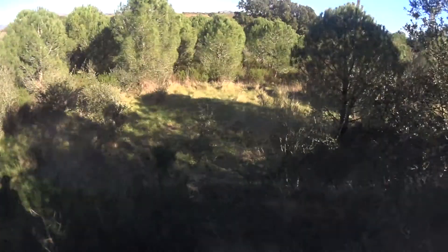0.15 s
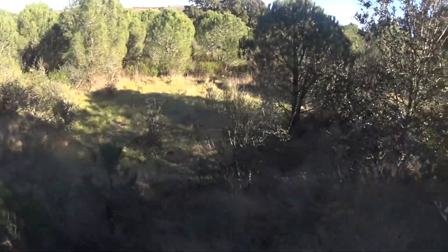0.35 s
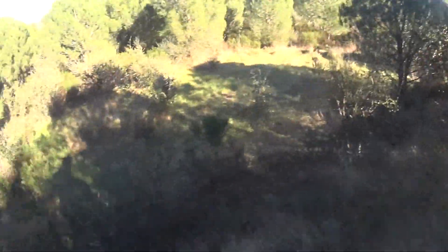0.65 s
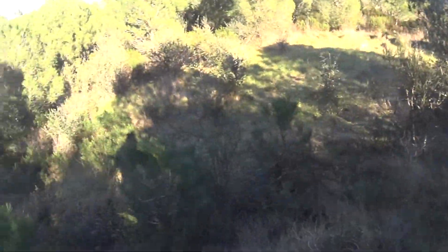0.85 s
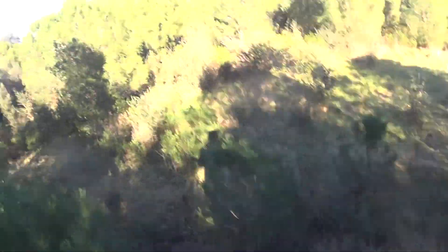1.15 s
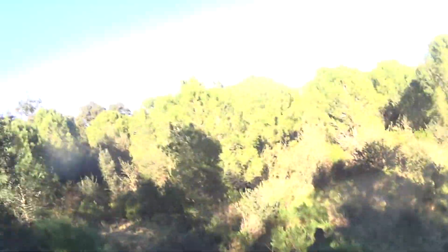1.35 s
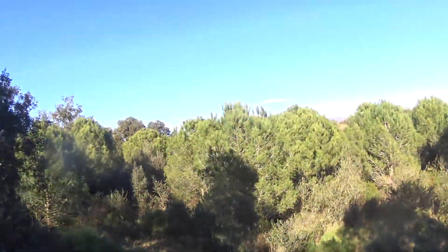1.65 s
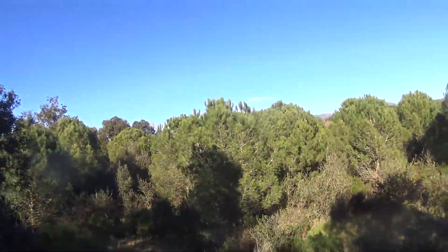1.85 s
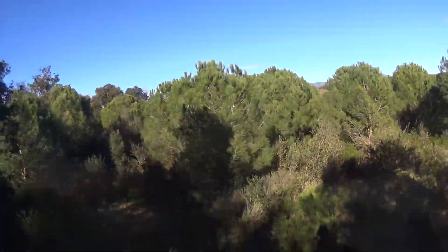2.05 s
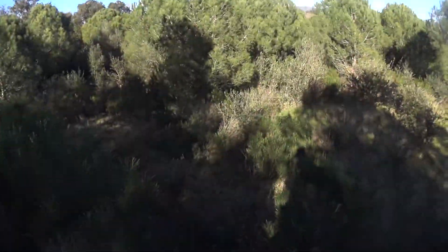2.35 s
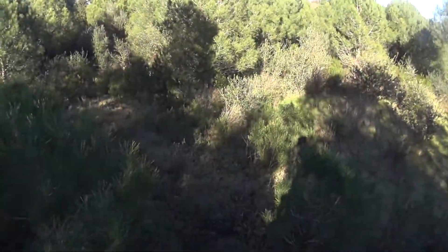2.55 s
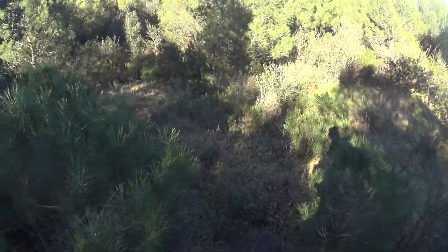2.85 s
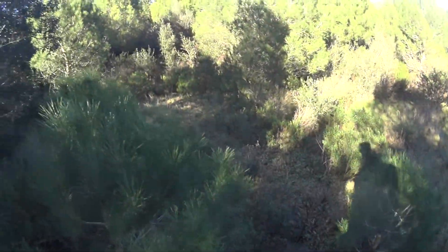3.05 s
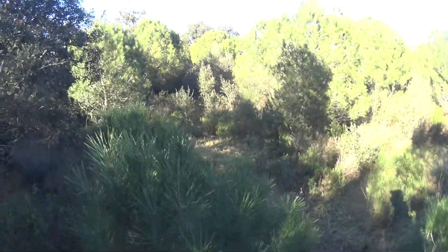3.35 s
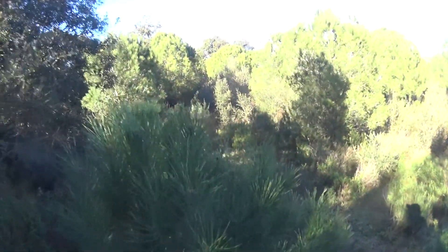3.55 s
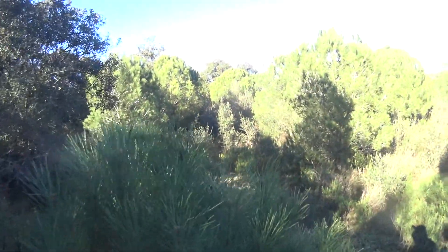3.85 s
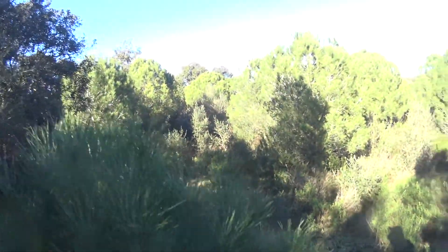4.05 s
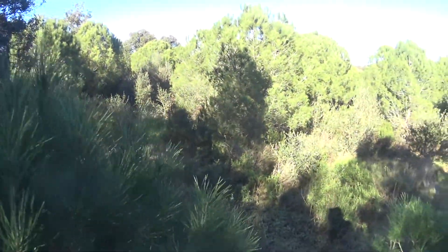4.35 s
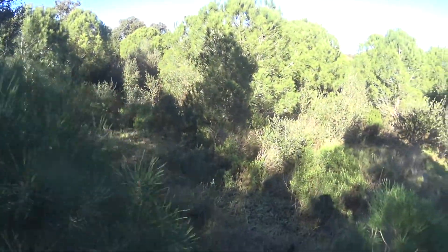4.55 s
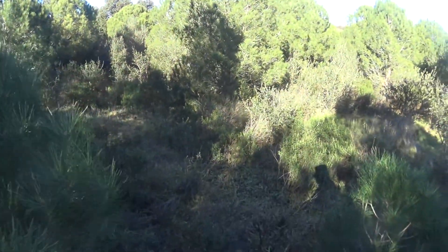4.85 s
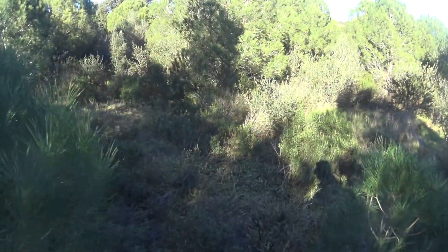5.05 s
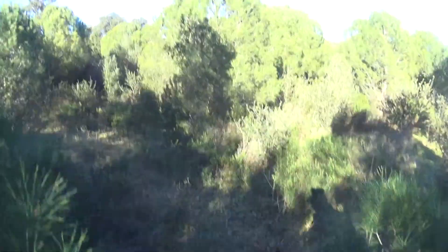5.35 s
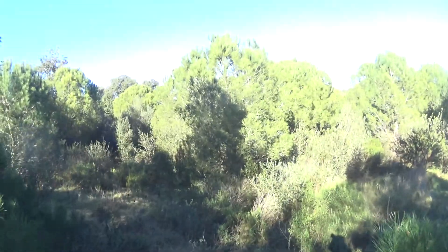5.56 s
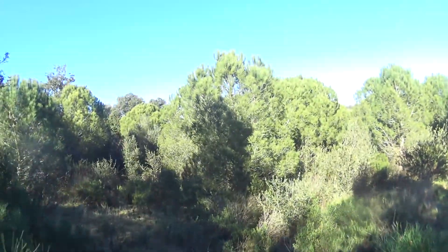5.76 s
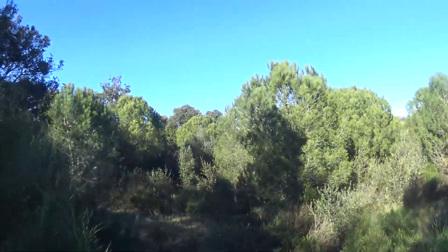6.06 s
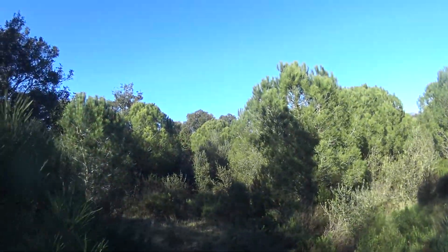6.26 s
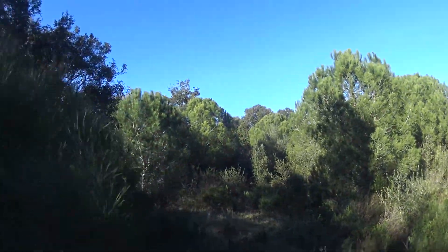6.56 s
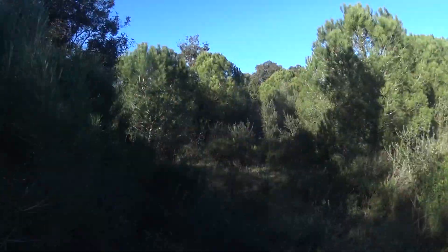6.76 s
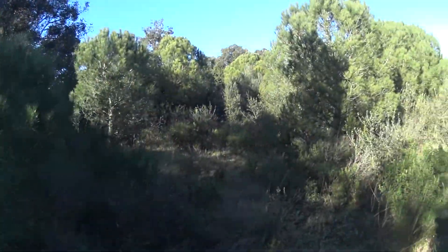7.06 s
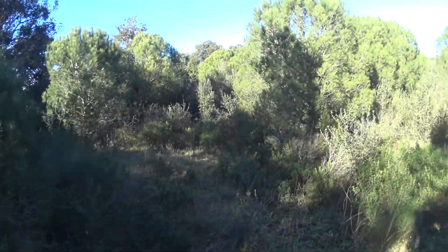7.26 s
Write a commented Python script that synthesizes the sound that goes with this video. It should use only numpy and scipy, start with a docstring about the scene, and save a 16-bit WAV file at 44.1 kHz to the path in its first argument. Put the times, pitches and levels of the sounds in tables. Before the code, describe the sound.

Outdoor walking through dense dry undergrowth, heard close in stereo from a small camera in hand, without echo. First come crackling stems, scattered snaps, dull steps and short plastic creaks; then needled boughs swish finely over cloth amid busier twig breaking. A hard housing knock comes late, followed by more steps and rustle over faint airy hiss.

```python
"""Dry stems crackle from the start as someone pushes through scrub, a small camera in hand.
Within half a second a twig snaps, a foot thuds softly and the camera's plastic housing creaks by stick-slip.
From about 3.3 s pine needles, a fine grain of noise, sweep over clothing; the hardest snap comes near 5 s.
Steps, stems and needles go on to the end; the hardest knock of the housing comes near 6.7 s.
Quiet open air, coloured noise, lies behind it all."""
import sys
import numpy as np
from scipy import signal
from scipy.fft import rfft, irfft, next_fast_len
from scipy.io import wavfile

SR = 44100
rng = np.random.default_rng(int(sys.argv[2]) if len(sys.argv) > 2 else 0)


def generate_wav(sig):
    """Save sig (samples, or channels by samples) to the path in sys.argv[1] as 16-bit PCM at SR."""
    pcm = np.round(np.clip(np.atleast_2d(sig).T, -1, 1) * 32767).astype(np.int16)
    wavfile.write(sys.argv[1], SR, pcm)


N = 326378
TIME_S = np.arange(N) / SR
LEFT_RIGHT = np.array([[1], [-1]])

# Spectra before level scaling. Each row: frequency in Hz, relative density in dB.
AIR_COLOUR = [(20, 7), (50, -5), (120, -7.5), (250, -9), (450, -9), (800, -12), (1200, -13), (2200, -8),
              (3500, -16), (6000, -21.5), (11000, -32)]
THUD_COLOUR = [(10, -10), (25, -0.5), (40, -12.5), (70, -18), (150, -38), (400, -63)]
BUMP_COLOUR = [(40, -48), (100, -5.5), (170, -0.5), (260, -11.5), (600, -53), (2000, -52)]
LITTER_COLOUR = [(120, -21), (280, -6.5), (480, -4.5), (900, -17), (2000, -10), (6000, -38)]
NEEDLE_COLOUR = [(300, -11), (1200, -11), (1500, -21), (1800, 1.5), (2400, -5), (3400, -7.5), (5300, -2.5),
                 (8000, -9.5), (11000, -10.5)]
TWIG_COLOUR = [(120, -34), (400, -10), (1300, -27), (2000, -3.5), (2600, 0.5), (3700, -1.5), (5000, 3),
               (6500, -0.5), (7400, -0.5), (8500, -4), (9800, 3), (11000, -3)]
STEM_COLOUR = [(300, -18.5), (1100, -16.5), (1450, -7), (1900, 3.5), (2500, 5), (3700, -3), (4400, -2.5),
               (5250, -2), (6500, -6), (7400, -7), (8400, -11), (9600, -5.5), (11000, -6)]
# Stereo width at the two microphone ports. Each row: frequency in Hz, gain of the side signal in dB.
AIR_WIDTH = [(30, -30), (110, -9), (300, -0.5), (1000, 6.5), (2200, -1.5), (6000, 3.5)]
HOUSING_WIDTH = [(800, -10.5), (1900, -14), (2800, -4), (5000, -7), (6800, 12), (10000, -4)]
BRUSH_WIDTH = [(60, -5), (300, -1.5), (1100, -4), (2100, -11.5), (3600, -11), (6500, -3.5), (11000, 0)]
# Footfalls. Each row: start in seconds, length in seconds (peak at a third of it), then peak levels in dB of
# the thud, the bump of the ground and the dull crunch of the litter.
STEPS = [(0.325, 0.18, -52, -73, -65), (1.145, 0.1, -56, -74, -61), (1.64, 0.12, -68, -60.5, -62),
         (1.966, 0.25, -54.5, -56.5, -66), (3.47, 0.26, -45, -64, -64), (4.347, 0.055, -61, -60.5, -52.5),
         (5.179, 0.11, -52, -59.5, -63), (5.753, 0.16, -62, -79, -58), (6.539, 0.096, -67, -70, -49.5),
         (6.614, 0.26, -51, -58, -54.5), (7.33, 0.061, -49, -62.5, -67)]
# Runs of slips in the housing. Each row: time of the first full slip in seconds, level in dB,
# length in seconds, frequency in Hz of the ring that paces the slips, hardness in dB.
CREAKS = [(0.475, -32.5, 0.0079, 1833, -1), (0.4902, -43, 0.0014, 1960, -7),
          (1.58, -35, 0.0098, 1780, -5.5), (2.119, -34, 0.0046, 1690, 4.5), (3.243, -34, 0.016, 1885, -2),
          (3.4518, -38, 0.007, 1863, -2), (5.193, -53.5, 0.033, 1693, 1), (6.286, -31.5, 0.01, 1942, 3),
          (6.4880, -45, 0.017, 1756, -8), (6.619, -53, 0.0067, 1736, -9), (6.744, -27.5, 0.0033, 1880, 8)]
# Modes of the housing. Each row: frequency in Hz, width in Hz, level before contact colour in dB.
HOUSING_MODES = [(540, 250, -19.5), (825, 160, -12.5), (1297, 64, -15), (1720, 37, -17.5), (1748, 573, 3),
                 (2267, 515, -1), (3366, 180, -13.5), (4154, 220, -8.5), (5230, 150, -8.5),
                 (7600, 230, -24.5)]
# Pine boughs sliding over clothing. Each row: time of full rise in seconds, length in seconds, level in dB.
BOUGH_PASSES = [(3.38, 0.42, -48), (3.82, 0.38, -52.5), (4.35, 0.77, -49), (5.15, 0.19, -55),
                (5.4, 0.47, -62.5), (6.16, 0.031, -52.5), (6.53, 0.16, -57), (6.81, 0.086, -60),
                (6.94, .12, -52.5), (7.11, 0.39, -57)]
# Twigs that stand out, loud or alone.
# Each row: time in seconds, level before the brightness tilt in dB, brightness setting in dB.
SNAPS = [(0.1322, -46, -12), (0.3084, -39, -8), (0.3128, -38.5, 21.5), (1.0698, -44, 11), (1.6868, -58, 6),
         (1.9277, -43.5, -2), (3.1543, -53, 8), (3.4164, -40, 6), (3.4725, -52, 22.5), (3.6289, -34, 2.5),
         (3.704, -36, -1.5), (4.2003, -45.5, 7), (4.2586, -44, -8), (4.552, -45.5, -21), (4.5842, -47, -10),
         (4.6515, -42, 3), (4.765, -46, 8.5), (4.7803, -45.5, -27), (4.823, -47, -18), (4.8367, -39, -3.5),
         (4.9412, -43.5, 9), (4.975, -44.5, 12), (5.0289, -30, -1.5), (5.0618, -42, -10),
         (5.0947, -42.5, 4), (5.134, -45.5, -24)]
# Legs pushing through dry stems; dead leaves crackle brightly, soft grass swishes dully.
# Each row: time of full rise in seconds, length in seconds, level in dB, treble relative to it in dB.
STEM_PUSHES = [(0.0, 0.23, -47.5, -5), (0.307, 0.058, -40.5, 2), (0.452, 0.12, -43.5, -7),
               (0.652, 0.13, -45.5, -4), (0.85, 0.048, -52.5, 0.5), (1.044, .13, -52, 2),
               (1.283, 0.28, -52, -13), (1.907, 0.35, -48.5, -3.5), (2.105, 0.17, -48.5, -16),
               (2.53, 0.22, -54.5, 3.5), (2.821, 0.15, -51, 3), (3.062, 0.19, -49.5, -4.5),
               (3.371, 0.24, -43.5, 1), (3.906, 0.58, -46, -2.5), (4.56, 0.53, -44, -0.5),
               (5.167, 0.12, -50, -0.5), (5.782, 0.05, -53.5, -3.5), (5.967, 0.036, -52.5, -6),
               (6.526, 0.23, -48.5, -2), (6.94, 0.54, -52.5, -8)]

AIR_DB = -56.5
LITTER_DRAG_DB = -16.5  # litter dragged by the feet, relative to the stems
BOUGH_ATTACK_S, BOUGH_EASE_DB_PER_S, BOUGH_T60_S = 0.05, 1, 0.33
PEAK_SMALL_SNAPS_PER_S = 13  # at the hardest push of the boughs
SMALL_SNAP_DB, SMALL_SNAP_SPREAD_DB, BRIGHTNESS_SPREAD_DB = -51, 2.5, 8
TYPICAL_SNAP_T60_S, TYPICAL_SNAP_DB = 0.0094, -44
STEM_ATTACK_S, STEM_EASE_DB_PER_S, STEM_T60_S = 0.09, 6, 0.41
STEM_REST_DB, TREBLE_HZ = -60, 5330  # stems stirring between pushes; where their treble begins
TOP_HZ = 11000


def undb(db):
    """Decibels to gain."""
    return 10 ** (np.asarray(db) / 20)


def unit(x):
    """Scale to rms 1."""
    return x / np.sqrt(np.mean(x ** 2) + 1e-20)


def colour(x, points):
    """Causal minimum-phase filter with the given (Hz, dB) response."""
    size = x.shape[-1]
    point_hz, point_db = np.transpose(points)
    hz = np.fft.rfftfreq(2 * size, 1 / SR) + 1  # keeps the log finite
    log_gain = np.log(undb(np.interp(np.log(hz), np.log(point_hz), point_db)))
    cepstrum = irfft(log_gain)[:size]
    cepstrum[1:] *= 2
    response = np.exp(rfft(cepstrum, 2 * size))
    return irfft(rfft(x, 2 * size) * response)[..., :size]


def ports(pair, width):
    """Left and right from a mid and a side signal."""
    return pair[0] + LEFT_RIGHT * colour(pair[1], width)


def noise():
    """Two unrelated white noises, at least as long as the scene."""
    return rng.standard_normal((2, next_fast_len(N, real=True)))


def walk(knots_per_s):
    """Random wander, linear between knots, with a spread near 1."""
    knots = rng.standard_normal(N // 100)
    return 1.2 * np.interp(TIME_S * knots_per_s, np.arange(len(knots)), knots)


def fade(t_s, t60_s):
    """Exponential decay, 60 dB down after t60_s."""
    return np.exp(-np.log(1000) * t_s / t60_s)


def add(out, start_s, sound):
    """Mix a sound in at start_s."""
    start = max(int(start_s * SR), 0)
    part = sound[:, :N - start]
    out[:, start:start + part.shape[1]] += part


def pushes(rows, attack_s, ease_db_per_s, t60_s):
    """Gain of pushes: each rises, eases off and dies away; overlapping ones add in power."""
    power = 0
    for full_s, length_s, db in rows:
        age_s = TIME_S - full_s
        rise = np.clip(1 + age_s / attack_s, 0, 1)
        eased = undb(db - ease_db_per_s * np.clip(age_s, 0, length_s))
        release = fade(np.maximum(age_s - length_s, 0), t60_s)
        power = power + (rise * eased * release) ** 2
    return np.sqrt(power)


def fracture(t60_s, scatter_db, scatter_t60_s, size=4096):
    """A fibre breaks: a short irregular ring, then scatter from ground and branches (mid and side)."""
    t_s = np.arange(size) / SR
    envelope = fade(t_s, t60_s) + undb(scatter_db) * fade(t_s, scatter_t60_s)
    return rng.standard_normal((2, size)) * envelope


def crackle(breaks_per_s, spread_db, hiss_db, flurry_db, bands=6):
    """Fibres of low to high pitch break at random, each band in its own flurries, over a sliding hiss."""
    hiss = noise()
    total = np.zeros_like(hiss)
    for pitch_hz in np.geomspace(2200, 10000, bands):
        chance = breaks_per_s / bands / SR * undb(flurry_db * walk(30))
        breaks = rng.random(N) < chance
        # positive spread: few large breaks; negative: few tiny ones
        sizes = undb(spread_db * np.minimum(rng.exponential(size=N), 4.5))
        fibre = fracture(t60_s=0.007, scatter_db=-14, scatter_t60_s=0.06)
        ring = colour(fibre, [(pitch_hz / 2, -8), (pitch_hz, 0), (pitch_hz * 2, -8)])
        total[:, :N] += signal.oaconvolve((breaks * sizes)[None], ring, axes=1)[:, :N]
    return unit(total) + undb(hiss_db) * hiss


def air():
    """Faint open-air rumble and hiss: coloured noise wavering very slightly in level."""
    sound = unit(colour(ports(noise(), AIR_WIDTH), AIR_COLOUR))[:, :N]
    return sound * undb(AIR_DB + 0.09 * walk(3.9))


def footfalls(effort):
    """Each step jolts the camera, bumps the ground and presses soft litter, which also drags with the legs."""
    gains = np.zeros((3, N))
    for start_s, length_s, *levels_db in STEPS:
        age = np.arange(SR) / SR / (length_s / 3)
        add(gains, start_s, undb(levels_db)[:, None] * age * np.exp((1 - age ** 2) / 2))
    gains[2] = np.hypot(gains[2], undb(LITTER_DRAG_DB) * effort)
    out = 0
    for gain, points in zip(gains, (THUD_COLOUR, BUMP_COLOUR, LITTER_COLOUR)):
        out = out + gain * unit(colour(ports(noise(), AIR_WIDTH), points))[:, :N]
    return out


def housing(size=4096, count=40):
    """Plastic sticks and slips about every two or three cycles of its ring; each slip rings the hollow shell."""
    out = np.zeros((2, N))
    hz = np.fft.rfftfreq(size, 1 / SR) + 1
    for full_s, db, length_s, ring_hz, hard_db in CREAKS:
        cycles = rng.choice([2, 3], count) + 0.11 * rng.standard_normal(count)
        gaps_s = cycles / ring_hz
        slip_s = np.cumsum(gaps_s) - gaps_s[:3].sum()  # relative to the first full slip
        load = np.exp(-(np.maximum(slip_s, 0) / length_s) ** 4)
        load = load * undb(np.where(slip_s < 0, -21 - hard_db, 0))  # soft onset
        force = load * undb(2 * rng.standard_normal((2, count)))
        force[1] *= rng.choice([-1, 1], count)  # the shell rocks either way between the ports
        slips = np.zeros((2, size))
        slips[:, np.minimum((slip_s - slip_s[0]) * SR, size - 1).astype(int)] = force
        ring = 0
        for k, (mode_hz, width_hz, mode_db) in enumerate(HOUSING_MODES):
            mode = irfft(rfft(slips) / (1 + 1j * (hz - mode_hz ** 2 / hz) / width_hz))
            ring = ring + (-1) ** k * undb(mode_db) * np.array([unit(m) for m in mode])
        # a hard slip wakes all the modes; a soft one mostly the main ring and the low body
        contact = [(450, 3.5 - hard_db), (800, -0.86), (1300, 0.5 * hard_db), (1900, 0.39),
                   (2600, 0.83 * hard_db), (3600, hard_db - 4.5), (7500, hard_db - 13.5),
                   (10000, hard_db - 16)]
        creak = unit(colour(ports(ring, HOUSING_WIDTH), contact))
        add(out, full_s + slip_s[0], creak * undb(db))
    return out


def needles(effort):
    """Soft needles slide over cloth: a fine, dull grain of dense small breaks."""
    grain = crackle(breaks_per_s=1500, spread_db=-2.5, hiss_db=-4.5, flurry_db=8)
    sound = colour(ports(grain, BRUSH_WIDTH), NEEDLE_COLOUR)[:, :N]
    return unit(sound) * effort * undb(1.1 * walk(25))


def small_snaps(effort, count=200):
    """Rows like SNAPS for lesser twigs, breaking at random at a rate that follows the power of the push."""
    when, luck = rng.random((count, 2)).T
    size, shade = rng.standard_normal((count, 2)).T
    at = (when * N).astype(int)
    peak_chance = PEAK_SMALL_SNAPS_PER_S * N / SR / count
    breaks = luck < peak_chance * (effort[at] / effort.max()) ** 2
    level_db = SMALL_SNAP_DB + SMALL_SNAP_SPREAD_DB * size
    return np.column_stack([TIME_S[at], level_db, BRIGHTNESS_SPREAD_DB * shade])[breaks]


def twigs(snaps, count=6):
    """A twig cracks sharply and splinters for some milliseconds; strong ones ring longer."""
    out = np.zeros((2, N))
    for start_s, db, bright_db in snaps:
        strength = undb(0.3 * (db - TYPICAL_SNAP_DB))
        crack = fracture(TYPICAL_SNAP_T60_S * strength, scatter_db=-17, scatter_t60_s=0.045)
        lags_s = rng.uniform(0, 0.012, count)
        for lag_s, splinter_db in zip(lags_s, rng.normal(-14, 1.3, count)):
            splinter = fracture(t60_s=0.005, scatter_db=-26, scatter_t60_s=0.03)
            crack = crack + undb(splinter_db) * np.roll(splinter, int(lag_s * SR), axis=1)
        crack = ports(crack * undb([[0], [-5]]), BRUSH_WIDTH)  # less side: nearer straight ahead
        tilt = [(3000, -0.2 * bright_db), (8500, 0.74 * bright_db - 8.0)]
        crack = colour(unit(colour(crack, TWIG_COLOUR)), tilt)
        add(out, start_s, crack * undb(db))
    return out


def brush(effort, treble_effort):
    """Dry stems crackle in small flurries as the legs bend them; brittle leaves add the treble."""
    grain = crackle(breaks_per_s=800, spread_db=3.8, hiss_db=0, flurry_db=5)
    sound = unit(colour(ports(grain, BRUSH_WIDTH), STEM_COLOUR)[:, :N])
    lowpass = signal.butter(4, TREBLE_HZ, fs=SR, output="sos")
    body = signal.sosfiltfilt(lowpass, sound)
    treble = sound - body
    rest = undb(STEM_REST_DB)
    pushed = body * np.hypot(effort, rest) + treble * np.hypot(treble_effort, rest)
    return pushed * undb(1.9 * walk(35))


def scene():
    """Sum of all layers, close by and without wall echoes."""
    stem_shape = STEM_ATTACK_S, STEM_EASE_DB_PER_S, STEM_T60_S
    legs = pushes([(s, length_s, db) for s, length_s, db, _ in STEM_PUSHES], *stem_shape)
    leaf_rows = [(s, length_s, db + treble_db) for s, length_s, db, treble_db in STEM_PUSHES]
    leaves = pushes(leaf_rows, *stem_shape)
    boughs = pushes(BOUGH_PASSES, BOUGH_ATTACK_S, BOUGH_EASE_DB_PER_S, BOUGH_T60_S)
    snaps = [*SNAPS, *small_snaps(boughs)]
    background = air() + footfalls(legs) + housing()
    return background + needles(boughs) + twigs(snaps) + brush(legs, leaves)


def record(dry):
    """The camera cuts steeply above TOP_HZ: an elliptic low-pass."""
    return signal.sosfilt(signal.ellip(12, 0.2, 70, TOP_HZ, fs=SR, output="sos"), dry)


dry = scene()
out = record(dry)
generate_wav(out)
```